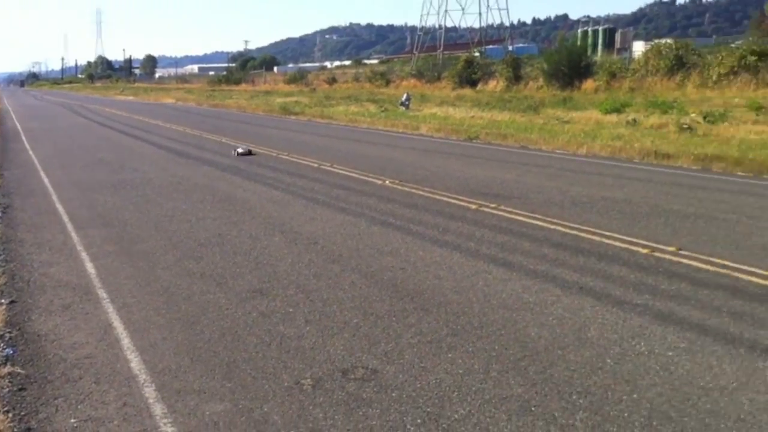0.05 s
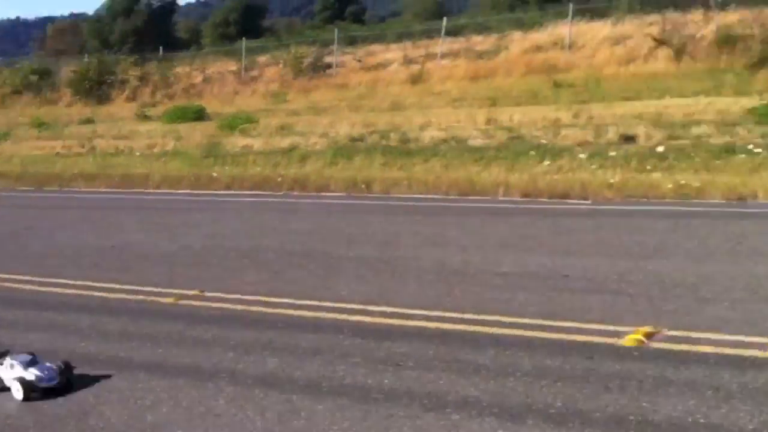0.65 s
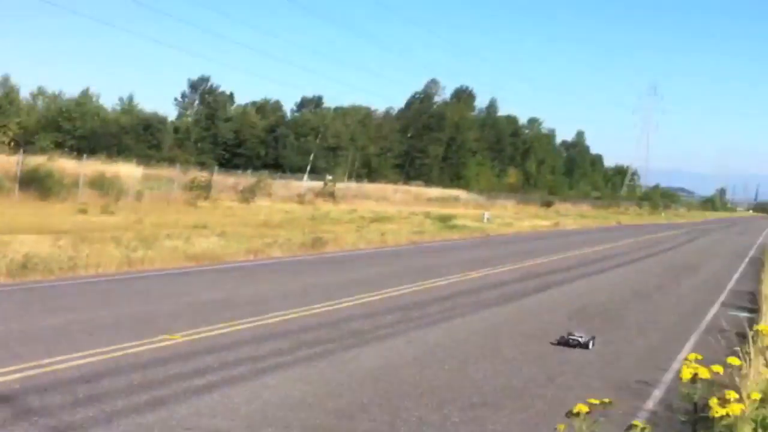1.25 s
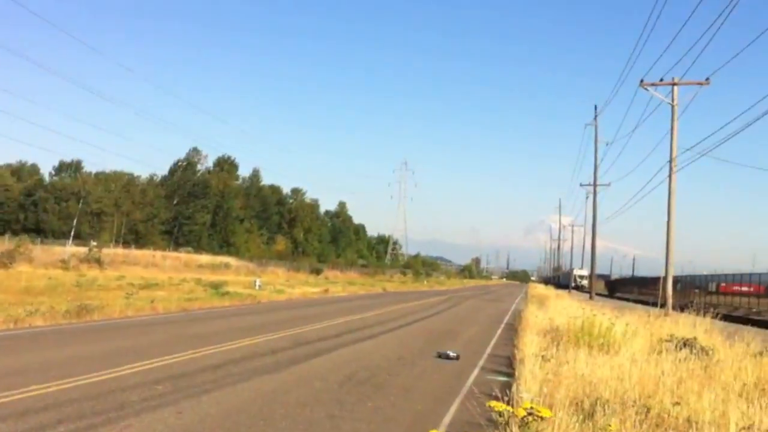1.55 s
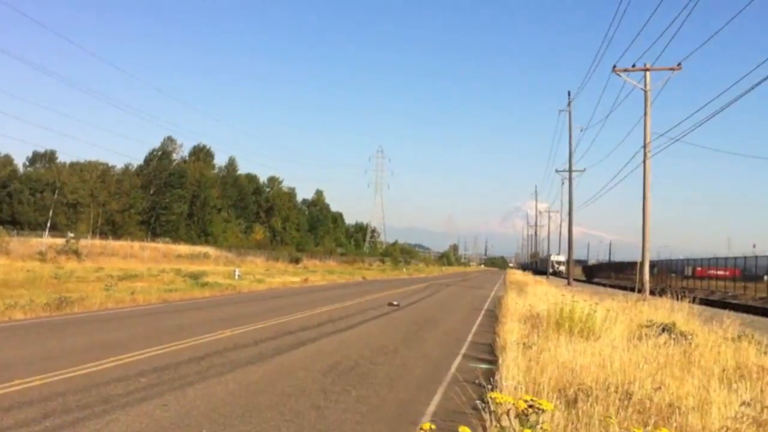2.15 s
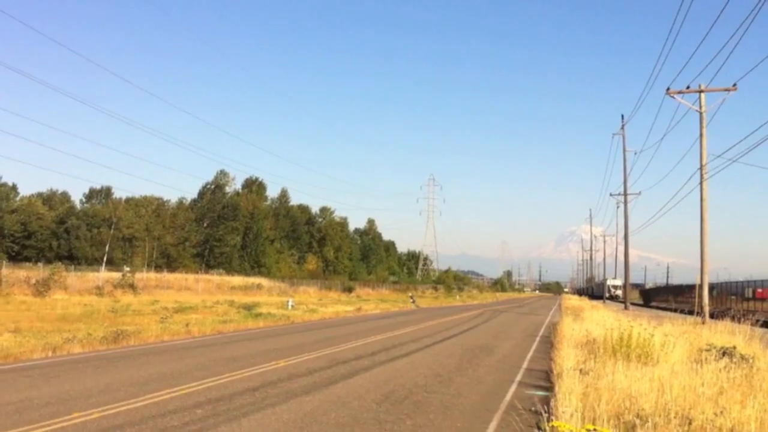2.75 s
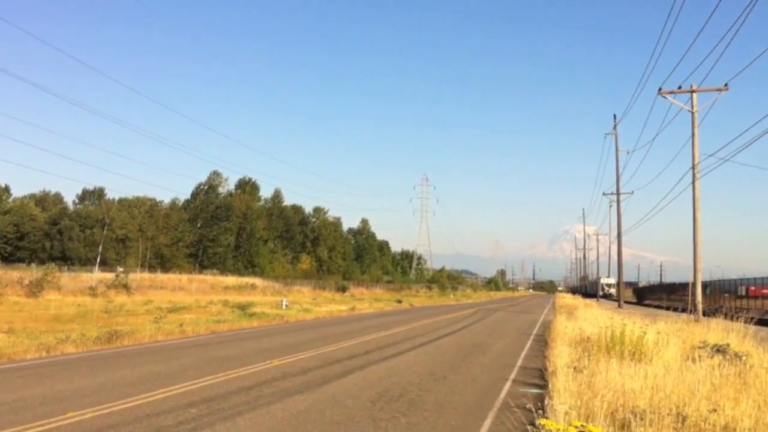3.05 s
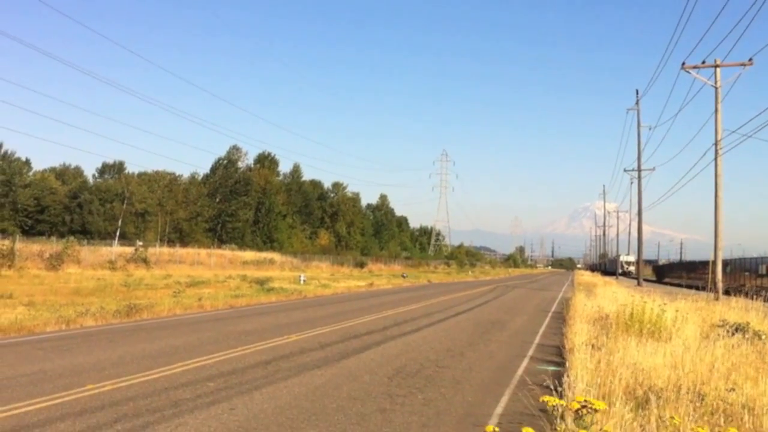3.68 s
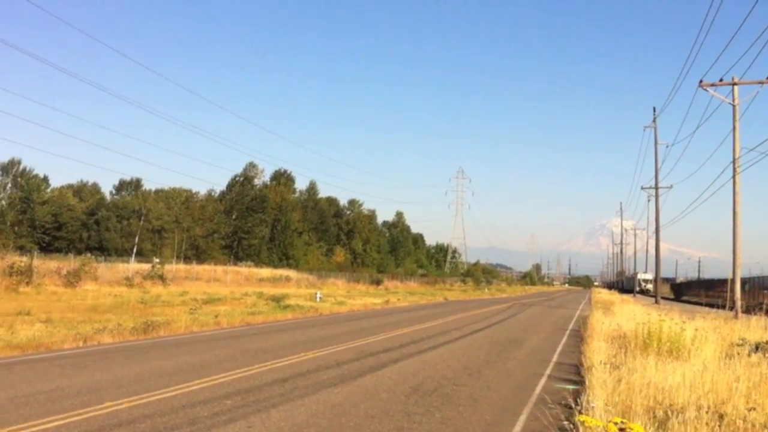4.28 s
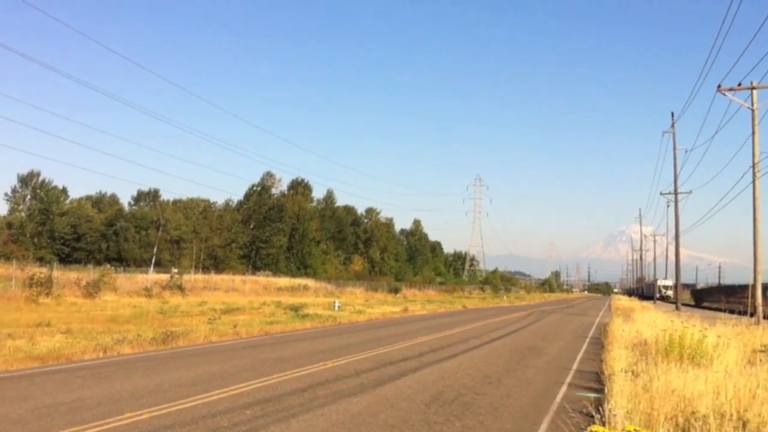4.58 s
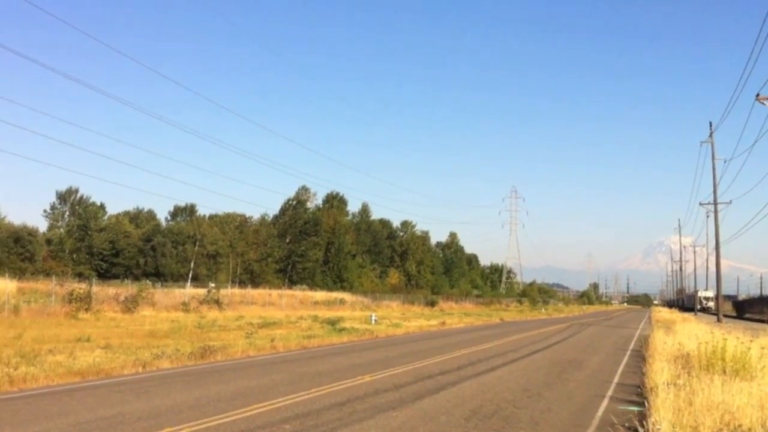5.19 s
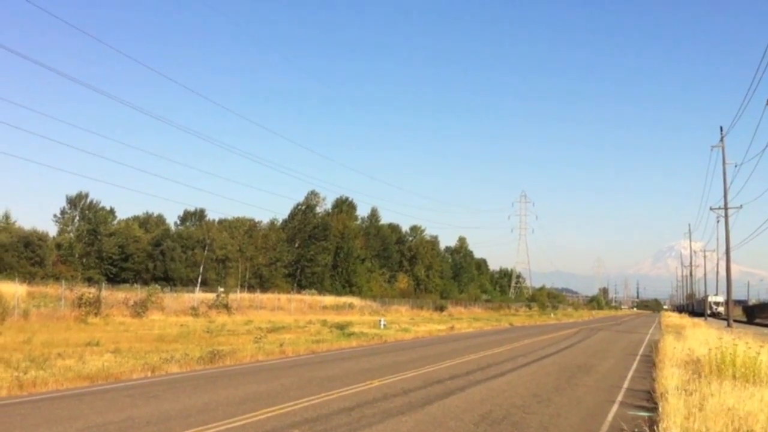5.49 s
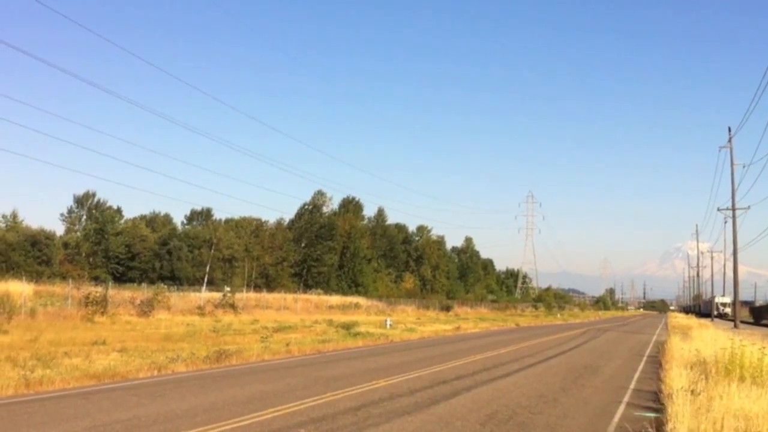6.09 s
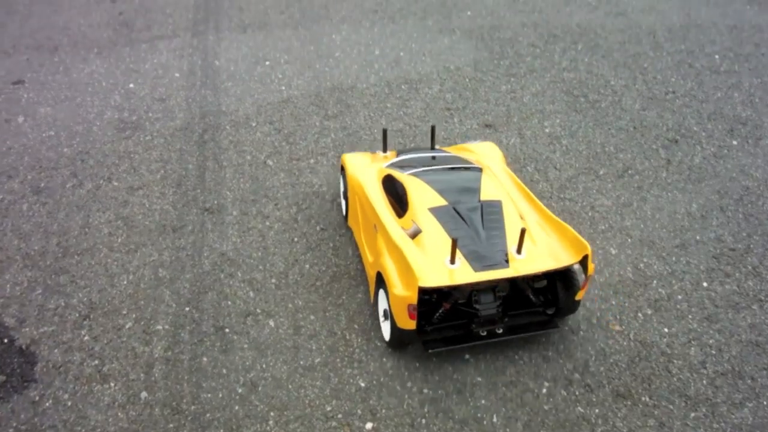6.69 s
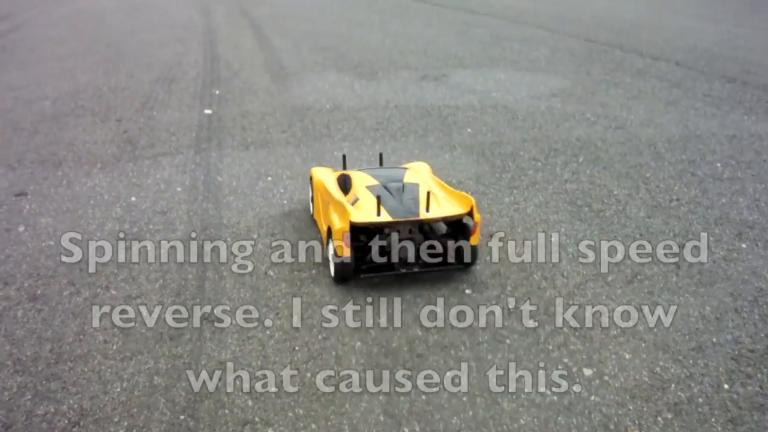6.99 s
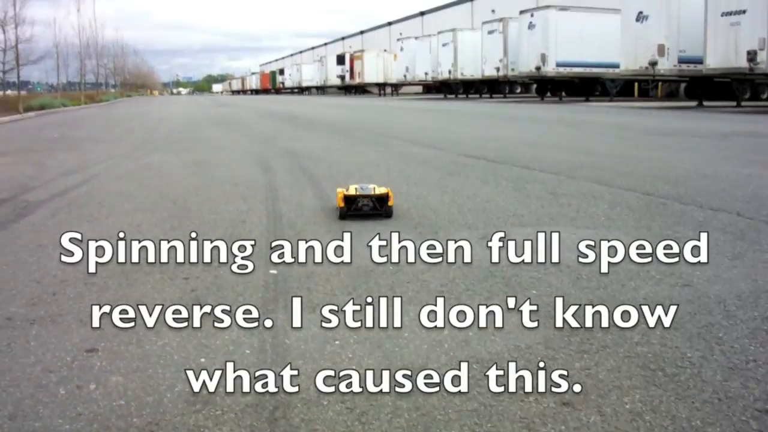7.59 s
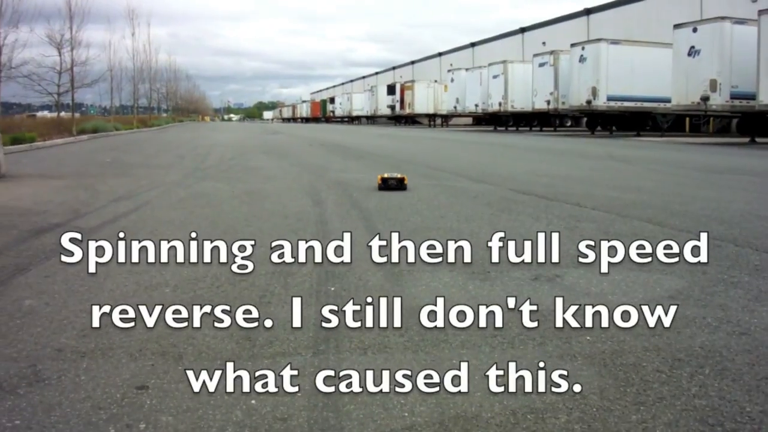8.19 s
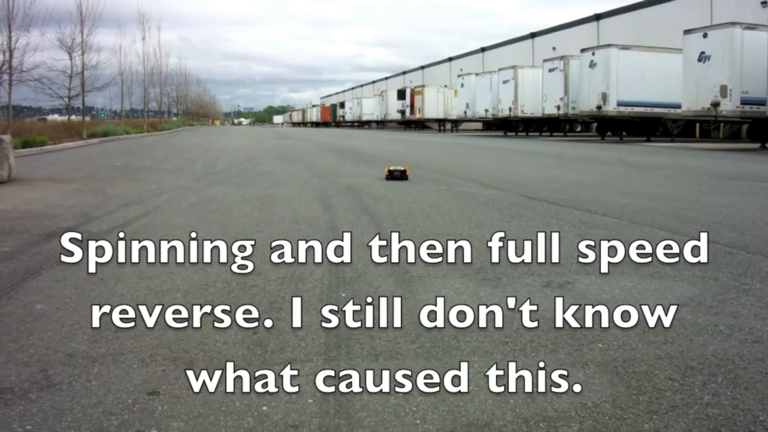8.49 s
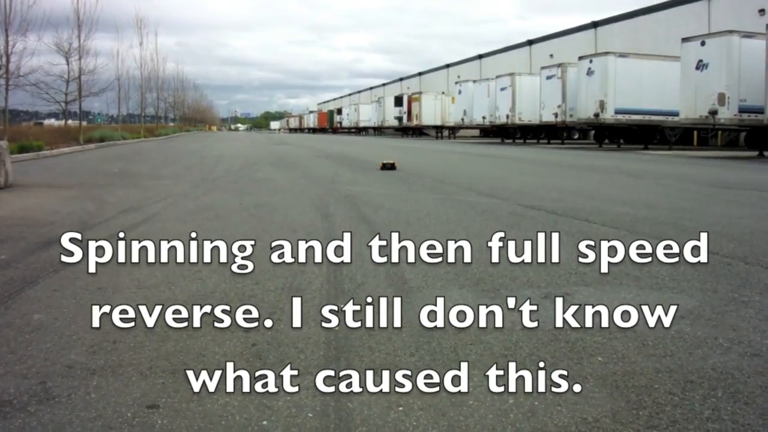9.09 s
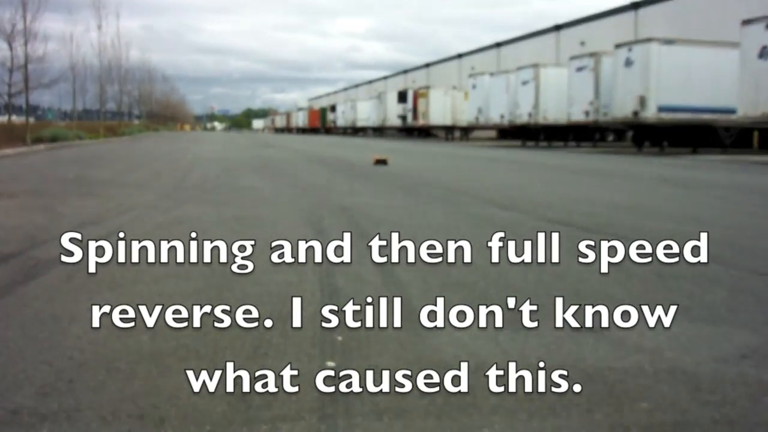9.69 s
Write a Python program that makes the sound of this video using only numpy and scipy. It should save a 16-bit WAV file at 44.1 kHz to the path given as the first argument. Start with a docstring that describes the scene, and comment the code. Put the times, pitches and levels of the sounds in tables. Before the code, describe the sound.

Outdoors on a country road, a faint distant engine hums under a light breeze and soft bumps on the microphone. A radio-controlled car approaches and hisses past at about 1 second, tyres drumming, chassis rattling, its shrill drive dropping in pitch. It rasps briefly as it brakes, then tumbles far off from 2.6 seconds, its hollow plastic shell knocking and scraping until around 4, with faint scrapes afterwards.

At 6.5 seconds the scene changes to a breezy paved lot. A second car stutters close by in rough buzzing bursts, then spins its wheels from 6.8 to 7.6, tyres scrubbing and gears howling upward, slightly overloading the microphone. It coasts with a whir, launches with a grind at 8.2 and whines away, rising gently, amid rumbling gusts. A very loud, sharp crack near the microphone at 9.1 makes everything quieter; a smaller crack follows at 9.6.

```python
"""On a country road, over a distant engine's hum and soft bumps on the camera, a radio-controlled car
hisses past: tyres drum and the shrill drive drops in pitch. Far off it tumbles, its hollow shell
scraping and ringing. Cut to a breezy paved lot: a second car stutters, then spins its wheels, the
howling gears overloading the microphone. It coasts, launches with a grind and whines away. A sharp
crack makes the recorder turn its gain down, and a smaller crack follows."""
import sys
import numpy as np
from scipy import signal
from scipy.fft import rfft, irfft, next_fast_len
from scipy.io import wavfile
from scipy.ndimage import uniform_filter1d, map_coordinates

SR = 44100
rng = np.random.default_rng(int(sys.argv[2]) if len(sys.argv) > 2 else 0)


def wrap_up_sound(samples):
    """Save the sound to the file named by the first command line argument, as 16-bit audio."""
    columns = np.atleast_2d(samples).T
    # keep every value between -1 and 1, then stretch to whole-number steps
    tamed = np.clip(columns, -1, 1)
    steps = np.round(tamed * 32767).astype(np.int16)
    wavfile.write(sys.argv[1], SR, steps)


N = 434385
T = np.arange(N) / SR

CLOSEST_S, LIFT_S, CRASH_S = 0.96, 2.03, 2.516  # first car: nearest, airborne, coming down
LOT_S = 6.538  # cut to the lot
SPIN_S, LET_GO_S, COAST_S, POWER_S = 6.822, 7.57, 7.66, 8.32  # wheelspin, throttle off, coast, launch

# Tone colours of the road. Each row: frequency in Hz, relative level in dB.
AIR_EQ = [(25, -50), (65, -19), (148, -6), (220, -13), (297, -12), (400, -20), (1200, -29), (3000, -40.5),
          (7000, -46.5), (15500, -48)]
BREEZE_EQ = [(30, -34), (80, -8.5), (160, 5), (500, -14.5), (2000, -57)]
TYRE_ROAR_EQ = [(30, -61), (200, -31), (430, -17), (600, -6), (730, -1.5), (870, -3.5), (1080, 1.5),
                (1380, -3.5), (1720, 0), (1950, -2), (2300, -11.5), (5000, -46.5)]
TYRE_RING_EQ = [(700, -35.5), (980, -7), (1080, .5), (1200, -3.5), (1400, -16), (1680, -7), (2000, -26.5)]
GEAR_FLARE_EQ = [(2700, -23.5), (3500, -3), (4800, 1.5), (5800, -12), (8000, -26)]
CHASSIS_EQ = [(1500, -16.5), (2500, 8.5), (3200, 6), (4200, -3.5), (5200, -5.5), (6000, -2.5), (6900, 3),
              (8300, -2), (12000, -25)]
SIZZLE_EQ = [(8000, -20), (12200, 1), (13200, 4.5), (15500, -8)]
CAMERA_CASE_EQ = [(50, -42.5), (110, -12), (170, -1.5), (270, -2), (380, -12.5), (700, -24), (2000, -73.5)]
TICK_EQ = [(2000, -8), (7000, -10.5), (11000, -.5), (15000, -13)]
SHELL_EQ = [(150, -27), (420, -10.5), (620, 8), (850, 1.5), (1180, 6.5), (1400, -3), (1700, 0.5),
            (2600, -14.5), (3600, -9), (4700, -16), (6500, -13), (15000, -29)]
# Tunable noise bands. Each row: multiple of the centre frequency, relative level in dB.
HISS_BAND = [(.55, -24), (.72, -14), (.88, -13.5), (.955, -2.5), (1, 0.5), (1.045, -3), (1.12, -13.5),
             (1.4, -29.5)]
BRAKE_RASP_BAND = [(.62, -22.5), (.9, 0), (1, -0.5), (1.13, -6), (1.35, -21), (2.3, -37)]
# Glides of the shrill drive and the tail's hiss. Each row: time in seconds, centre in Hz, level in dB.
DRIVE_GLIDE = [(0, 9800, -58), (.55, 10700, -35.5), (.82, 11230, -28), (.95, 10310, -21.5),
               (1.06, 8780, -27.5), (1.38, 8690, -40), (2.6, 8720, -94)]
TAIL_GLIDE = [(.8, 10700, -70), (1.03, 10650, -26.5), (1.55, 10070, -34), (2.0, 9580, -43.5),
              (2.8, 9700, -78.5)]
# Wheel speed on the pass. Each row: time in seconds, turns per second.
WHEEL_SPEED = [(0, 82), (.2, 82.5), (.42, 86), (.92, 87), (1.08, 83), (1.42, 83), (1.53, 56), (2.2, 53)]
# Comb filtering from the road bounce. Each row: time in seconds, lowest notch in Hz.
ROAD_NOTCH = [(.92, 2700), (1.0, 2380), (1.6, 2600)]
# Braking rasps. Each row: start and length in seconds, relative level in dB, centre in Hz.
BRAKE_RASPS = [(1.562, .09, -40.5, 5960), (1.68, .34, -35.5, 3450), (1.86, .07, -40.5, 4150)]
# Handling noises. Each row: start in seconds, relative peak in dB.
CAMERA_BUMPS = [(0.049, -31), (0.145, -30), (0.178, -30), (0.481, -28), (0.606, -27.5), (1.168, -27.5),
                (1.498, -27), (3.522, -26), (3.563, -23.5), (3.584, -25.5), (3.61, -26), (3.636, -32.5),
                (3.984, -36.5), (4.725, -34.5), (5.23, -33)]
CLOSE_TICKS = [(3.2767, -43), (3.3887, -39)]
# Shell scrapes. Each row: start in seconds, peak in dB, treble lift in dB, 60 dB decay in seconds.
SHELL_SCRAPES = [(2.648, -25.5, 3.5, .02), (2.663, -26, -2.5, 0.16), (2.941, -39, 1, 0.11),
                 (2.963, -35.5, 0, 0.15), (3.484, -36, 6, 0.28), (3.549, -34, 1.5, 0.3),
                 (3.72, -49.5, 10.5, 0.77), (4.255, -42, -12.5, 0.18), (5.479, -42, 12.5, 0.16)]
# Hard landings. Each row: start in seconds, peak in dB.
LANDINGS = [(2.648, -24), (2.651, -22), (2.6639, -20.5), (2.961, -31.5), (3.555, -27.5)]
# The shell's ring. Each row: pitch in Hz, relative level in dB, 60 dB decay in seconds.
SHELL_RING = [(605, -11.5, .1), (1066, 1.5, 0.055), (1560, 0.5, .035), (2120, -11, 0.044),
              (3400, -11, 0.041), (4060, -13, .03)]

# Tone colours of the lot. Each row: frequency in Hz, relative level in dB.
WIND_EQ = [(20, -19), (45, -4), (100, 0), (180, 2), (280, -12.5), (600, -24.5), (1500, -68)]
RASP_EQ = [(40, -35), (250, -15.5), (450, -14), (830, -10), (890, 1), (960, -12), (1600, -5.5), (2000, -6),
           (2400, 1), (3600, 1), (4200, -7), (6500, -19.5), (8000, -23.5), (15000, -32.5)]
SQUEAL_EQ = [(13500, -50), (14150, -9), (14350, 0), (14600, -12), (15200, -50)]
GRIT_EQ = [(3000, -29), (6500, 1.5), (11000, -4.5), (15500, -10)]
WHIR_EQ = [(150, -46.5), (250, -13.5), (574, -12), (909, -4.5), (1550, -12.5), (1810, -7.5), (2100, -8.5),
           (2350, -3.5), (2550, -8.5), (2780, -5), (3030, -9), (3710, -3), (4150, -14), (4730, -10.5),
           (5450, -16), (6100, -22), (7700, -34), (10000, -62), (16900, -120)]
FIZZ_EQ = [(6000, -31), (7000, 9.5), (7800, -8.5), (9000, -0.5), (15500, -16.5)]
GRIND_EQ = [(500, -29), (1500, -22), (2100, -2), (2450, 0.5), (2900, -3), (4000, -11.5), (6000, -21),
            (15000, -45)]
SNAP_EQ = [(300, -18), (1500, -11.5), (3600, -3), (4400, -8), (5500, 3), (6100, 0), (7200, -19.5),
           (10000, -28.5), (16000, -36)]
# Gusts on the microphone. Each row: start in seconds, level in dB.
WIND_GUSTS = [(8.59, -29), (8.725, -27)]
# The motor catching. Each row: start and length in seconds, relative level in dB.
MOTOR_BURSTS = [(6.583, 0.018, -32), (6.628, 0.056, -22), (6.75, 0.016, -19.5), (6.8, 0.021, -21)]
# Gear pitch in the stutter, the spin and the run. Each row: time in seconds, tooth rate in Hz.
STUTTER_PITCH = [(6.68, 854), (6.74, 763), (6.80, 829), (6.83, 740)]
SPIN_PITCH = [(6.82, 1194), (6.90, 1140), (6.925, 975), (6.95, 895), (7.01, 885.7), (7.06, 1085),
              (7.13, 1109), (7.41, 1510), (7.46, 1488), (7.66, 1468)]
RUN_PITCH = [(7.58, 676), (7.70, 717), (8.11, 719.3), (8.20, 865), (8.29, 929.7), (8.62, 913.4),
             (9.05, 951.7), (9.30, 967), (9.85, 1008)]
# Fader moves for tyre scrub and coasting whir. Each row: time in seconds, relative level in dB.
SCRUB_FADER = [(6.83, -47.5), (6.91, -41), (6.952, -29.5), (7.01, -24), (7.028, -32.5), (7.164, -36.5),
               (7.35, -29), (7.552, -27), (7.568, -40), (7.66, -43.5)]
COAST_FADER = [(7.66, -22.5), (7.868, -36), (8.006, -30), (8.08, -32), (8.12, -31.5)]
# Gearbox resonances. Each row: centre in Hz, width in Hz, gain in dB.
GEARBOX_PEAKS = [(895, 120, -15), (1394, 204, -14.5), (2275, 300, -22.5), (2750, 370, -17.5),
                 (3056, 170, -14), (3480, 260, -19), (3740, 120, -17.5), (4480, 420, -20.5)]
# Whine harmonics 1-5 against the whir. Each row: dB coasting, dB under power, drift in dB per second.
WHINE_HARMONICS = [(-13, -15.5, -3.5), (-26, -10, 0.5), (-15, -4, -6.5), (-14, -10, -3.5), (-13, -15.5, -2)]
# Close cracks. Each row: start in seconds, peak before clipping in dB, relative thud and body in dB.
CLOSE_CRACKS = [(9.0893, 14, -17, 6), (9.563, -2, -32, -5)]


def amp(db):
    """Decibels to gain."""
    return 10 ** (np.asarray(db) / 20)


def unit(x):
    """Scale to rms 1."""
    return x / np.sqrt(np.mean(x ** 2) + 1e-20)


def curves(rows):
    """One automation curve for each column after the time."""
    times, *columns = np.transpose(rows)
    return [np.interp(T, times, column) for column in columns]


def ramp(start, length):
    """A straight fade from 0 to 1."""
    return np.clip((T - start) / length, 0, 1)


def during(start, end, fade):
    """A gate, open between two times, with straight fades."""
    return np.clip(np.minimum(T - start, end - T) / fade + .5, 0, 1)


def held(start, length, db, rise, fall):
    """Gain that swells up to its start, holds and dies away; rise and fall are in dB per second."""
    return amp(db - rise * np.maximum(start - T, 0) - fall * np.maximum(T - start - length, 0))


def wobble(rate):
    """A smooth random curve, rate knots a second."""
    return map_coordinates(rng.standard_normal(int(N * rate / SR) + 4), [T * rate])


def colour(x, eq):
    """Minimum-phase EQ through (Hz, dB) points."""
    size = 2 * next_fast_len(len(x) // 2 + 4096)
    hz, db = np.transpose(eq)
    gain = amp(np.interp(np.log(np.fft.rfftfreq(size, 1 / SR) + 1), np.log(hz), db))
    cepstrum = irfft(np.log(gain))
    cepstrum[1:size // 2] *= 2
    cepstrum[size // 2 + 1:] = 0
    return irfft(rfft(x, size) * np.exp(rfft(cepstrum)))[:len(x)]


def rush(eq, grain_db=0, grain_rate=600):
    """Noise of rms 1: clumps of tiny impacts ringing through an EQ."""
    return unit(colour(rng.standard_normal(N) * amp(grain_db * wobble(grain_rate)), eq))


def burst(eq, t60):
    """A dying rattle through a body, peak 1."""
    t = np.arange(SR // 2) / SR
    x = colour(rng.standard_normal(len(t)) * amp(-60 * t / t60), eq)
    return x / np.abs(x).max()


def add(track, start, x):
    """Mix a sound in at a time."""
    room = track[round(start * SR):][:len(x)]
    room += x[:len(room)]


def varispeed(x, speed):
    """Loop a sound at a changing speed, bending its pitch."""
    return map_coordinates(x, [np.cumsum(speed)], order=3, mode="wrap")


def patchy(x, depth_db):
    """Let the colour wander in patches about 500 Hz wide and 0.2 s long."""
    spectra = signal.stft(x, nperseg=512)[2]
    patches = uniform_filter1d(rng.standard_normal(spectra.shape), size=6, axis=0)
    patches = uniform_filter1d(patches, size=36, axis=1)
    return signal.istft(spectra * unit(amp(depth_db * unit(patches))), nperseg=512)[1][:N]


def roadside():
    """The bed: open air, a distant engine's wavering hum and an opening breath of breeze."""
    hum = amp(1.8 * wobble(13)) * np.sin(2 * np.pi * np.cumsum(149 + 4 * wobble(17)) / SR)
    breeze = amp(-41 + 1.6 * wobble(8.4)) * during(-1, 1.39, fade=.48) * rush(BREEZE_EQ)
    ease_off = amp(np.interp(T, [5.5, 6.4], [0, -3]))
    return ease_off * (amp(-51.5) * rush(AIR_EQ) + amp(-49.5) * hum) + breeze


def pass_fader(db, coming, going, lift_db):
    """Gain falls as a power of distance, coming or going, dips at lift-off and dies with the crash."""
    distance = np.hypot(1, (T - CLOSEST_S) / .2)  # 1 when nearest
    lost_db = lift_db * ramp(LIFT_S, .25) + 45 * np.maximum(T - CRASH_S, 0)
    return amp(db - lost_db) / distance ** np.where(T < CLOSEST_S, coming, going)


def doppler(x, mach):
    """Pitch swings from sharp to flat as the car goes by."""
    bearing = (T - CLOSEST_S) / np.hypot(T - CLOSEST_S, .07)  # -1 coming, 1 going
    return varispeed(x, 1 / (1 + mach * bearing))


def tyres():
    """Tyres drum on coarse asphalt; their own ring lingers furthest down the road."""
    roar = doppler(rush(TYRE_ROAR_EQ, grain_db=1), mach=.13)
    roar *= pass_fader(-23.5, coming=1.79, going=1.53, lift_db=6)
    return roar + pass_fader(-34.5, coming=2, going=.4, lift_db=10) * rush(TYRE_RING_EQ)


def chassis_rattle(sway):
    """An unbalanced wheel shakes the chassis once a turn."""
    level = pass_fader(-27.5, coming=1.25, going=.8, lift_db=12)
    return level * unit(amp(5.5 * sway)) * doppler(rush(CHASSIS_EQ), mach=.04)


def drive_hiss(glide):
    """A shrill band of fine grains whose centre and level follow a glide."""
    hz, db = curves(glide)
    centre = np.mean(hz)
    band = rush([(centre * ratio, level) for ratio, level in HISS_BAND], grain_db=3, grain_rate=970)
    return amp(db) * unit(varispeed(band, hz / centre))


def passing_car():
    """The whole pass-by: tyres, gears and chassis with their bounce off the road, plus the drive's hiss."""
    rolling = tyres()
    # side-on, the gears are heard directly for an instant
    flare = held(.93, .04, db=-32, rise=148, fall=128.5) * rush(GEAR_FLARE_EQ, grain_db=3)
    turns = np.cumsum(curves(WHEEL_SPEED)[0] * (1 + .008 * wobble(25))) / SR
    sway = np.sin(2 * np.pi * turns)
    rattle = chassis_rattle(sway)
    brake = braking(turns)
    sizzle = rush(SIZZLE_EQ, grain_db=2.5, grain_rate=880)
    sizzle *= pass_fader(-25, coming=2.1, going=1.9, lift_db=14)  # the top end carries least far
    # the body beams its treble unevenly as it turns past the microphone
    car = rolling + patchy(sizzle + flare + rattle + brake, depth_db=1.8)
    drive = patchy(drive_hiss(DRIVE_GLIDE) + drive_hiss(TAIL_GLIDE), depth_db=1.8)
    drive *= unit(amp(1.5 * sway))
    delay_s = .5 / curves(ROAD_NOTCH)[0]
    bounce = .8 * map_coordinates(car, [(T - delay_s) * SR], order=3)
    bounce *= 1 - .5 * during(.99, 1.05, fade=.073)  # weak while the car flashes by
    return amp(-2) * (car + bounce) + drive


def handling():
    """Dull bumps on the camera and tiny ticks close to the microphone."""
    out = np.zeros(N)
    for start, db in CAMERA_BUMPS:
        add(out, start, amp(db + 1) * burst(CAMERA_CASE_EQ, t60=.088))
    for start, db in CLOSE_TICKS:
        add(out, start, amp(db + 2) * burst(TICK_EQ, t60=.005))
    return out


def braking(turns):
    """The gears rasp as the car brakes, chopped once a turn by the unbalanced wheel."""
    out = np.zeros(N)
    for start, length, db, hz in BRAKE_RASPS:
        eq = [(hz * ratio, level) for ratio, level in BRAKE_RASP_BAND]
        out += held(start, length, db, rise=63, fall=106) * rush(eq, grain_db=.5, grain_rate=200)
    return out * unit(amp(-20 * (turns % 1)))


def tumble():
    """The plastic shell scrapes along the road."""
    out = np.zeros(N)
    for start, db, treble_db, t60 in SHELL_SCRAPES:
        eq = [(hz, level + treble_db * (hz > 2200)) for hz, level in SHELL_EQ]
        add(out, start, amp(db) * burst(eq, t60))
    return out


def knocks():
    """Each hard landing rings the hollow shell with a slightly different colour."""
    out, t = np.zeros(N), np.arange(SR // 5) / SR
    for start, db in LANDINGS:
        ring = sum(amp(level + rng.normal(0, 2.4) - 60 * t / t60) * np.sin(2 * np.pi * hz * t)
                   for hz, level, t60 in SHELL_RING)
        add(out, start, amp(db) * ring / np.abs(ring).max())
    return out


def wind():
    """Wind rumbles on the microphone in the lot: it freshens as the car sets off and gusts twice."""
    steady = amp(-47.5 + 13.5 * ramp(8.1, .22) + 1.6 * wobble(12))
    gusts = sum(held(start, .015, db, rise=350, fall=300) for start, db in WIND_GUSTS)
    return (T > LOT_S) * np.hypot(steady, gusts) * rush(WIND_EQ)


def gear_tone(hz, harmonics_db, jitter, flutter_db, runout=0, rough=0):
    """Gear teeth meeting: fluttering harmonics of one unsteady speed."""
    phase = 2 * np.pi * np.cumsum(hz * (1 + jitter * wobble(260) + .001987 * wobble(30))) / SR
    sway = runout * np.sin(phase / 16)  # an off-centre pinion of 16 teeth
    teeth = phase + sway + rough * wobble(800)  # slack teeth strike early or late
    return sum(amp(db) * unit(amp(flutter_db * wobble(110)) * np.sin(k * teeth))
               for k, db in enumerate(harmonics_db, 1))


def stutter():
    """The motor catches and lets go: rough bursts of gear buzz with a thin squeal."""
    hz, = curves(STUTTER_PITCH)
    buzz = gear_tone(hz, [-20.5, -4.5, -16.5, -5.5, -23, -15.5], jitter=.025, flutter_db=4.5, rough=.15)
    rasp = amp(-1.5) * rush(RASP_EQ, grain_db=2, grain_rate=400)
    squeal = amp(-25) * rush(SQUEAL_EQ)
    idle = held(6.575, .25, db=-27.5, rise=600, fall=900)
    bursts = sum(held(*row, rise=2600, fall=1100) for row in MOTOR_BURSTS)
    return (T > LOT_S) * ((idle + bursts) * (rasp + squeal) + (.5 * idle + bursts) * buzz)


def gearbox_db(hz):
    """How strongly the gearbox radiates a tone: resonant peaks over a flat floor."""
    peaks = sum((amp(db) / (1 + (2 * (hz - centre) / width) ** 2)) ** 2
                for centre, width, db in GEARBOX_PEAKS)
    return 10 * np.log10(peaks + amp(-29.5) ** 2)


def wheelspin():
    """The gears howl through the gearbox's resonances, roughly at first, while the tyres scrub on grit."""
    hz, = curves(SPIN_PITCH)
    scrub_db = curves(SCRUB_FADER)[0] - np.mean(SCRUB_FADER, axis=0)[1]
    rasp = amp(-19 + .53 * scrub_db) * rush(RASP_EQ, grain_db=2, grain_rate=400)
    grit = amp(-42.5 + 1.7 * scrub_db) * rush(GRIT_EQ, grain_db=4, grain_rate=220)
    slack_db = -25 * ramp(LET_GO_S - .015, .033)  # off the throttle only the second harmonic sings on
    loose = 1 - ramp(SPIN_S + .03, .07)  # the teeth take a moment to bite
    drive_db = [-1 - 9 * loose + slack_db, -5 * loose,
                -3 - 4 * loose + slack_db, -8.5 - 9 * loose + slack_db]
    harmonics_db = [db + gearbox_db(k * hz) for k, db in enumerate(drive_db, 1)]
    jitter = np.interp(T, [7, 7.45], [.022, .003])
    rough = np.interp(T, [7.05, 7.35], [.22, .05])
    howl = gear_tone(hz, harmonics_db, jitter, flutter_db=3, runout=.22, rough=rough)
    return during(SPIN_S, COAST_S, fade=.008) * (rasp + grit + howl)


def soft_clip(x, ceiling):
    """Round off the peaks below a ceiling."""
    return x / (1 + np.abs(x / ceiling) ** 6) ** (1 / 6)


def mic_overload(x):
    """Close to the car the microphone saturates softly; the deepest bass is rolled off."""
    return colour(soft_clip(x, amp(-13.5)), [(25, -13), (70, 0)])


def run_away():
    """The car coasts, launches with a harsh grind and a chirp, and whines off into the distance."""
    hz, = curves(RUN_PITCH)
    driven_s = np.maximum(T - POWER_S, 0)
    power = ramp(POWER_S - .17, .13)
    distance = np.hypot(1, driven_s / 1.13)
    level = amp((1 - power) * curves(COAST_FADER)[0] - 20.5 * power) / distance
    whir = rush(WHIR_EQ, grain_db=1) + amp(-20) * rush(FIZZ_EQ, grain_db=1.5)
    whir *= ramp(COAST_S - .004, .0056)
    harmonics_db = [(1 - power) * coasting + power * driven + drift * driven_s
                    for coasting, driven, drift in WHINE_HARMONICS]
    whine = ramp(LET_GO_S, .026) * gear_tone(hz, harmonics_db, jitter=.003, flutter_db=2, runout=.1)
    bite = held(8.215, .07, db=-17, rise=200, fall=400) + held(8.268, .01, db=-20, rise=1500, fall=1500)
    grind = bite * rush(GRIND_EQ, grain_db=1, grain_rate=330)
    chirp = gear_tone(hz, [1.5, -9, -6], jitter=.0076, flutter_db=3)
    chirp *= held(8.19, .025, db=-25, rise=216, fall=220)
    return level * (whir + whine) + grind + chirp


def cracks():
    """Each crack is a hard snap with a short low ring of the camera's case."""
    out, t = np.zeros(N), np.arange(SR // 10) / SR
    for start, db, thud_db, body_db in CLOSE_CRACKS:
        eq = [(hz, level + body_db * (hz < 4500)) for hz, level in SNAP_EQ]
        add(out, start, amp(db) * burst(eq, t60=.008))
        add(out, start, amp(db + thud_db) * np.sin(2 * np.pi * 660 * t) * amp(-60 * t / .035))
    return out


def scene():
    """The mono mix: first the road, then the lot."""
    road = passing_car() + tumble() + knocks() + handling() + roadside()
    lot = mic_overload(stutter() + wheelspin()) + run_away() + wind() + cracks()
    return (road * during(-1, 6.49, fade=.071) + lot)[None]


def record(dry):
    """The recorder clips softly; just after a hard overload its gain steps down and stays there."""
    clipped = soft_clip(dry, ceiling=.92)
    overloaded = uniform_filter1d(clipped ** 2, 64, axis=-1) > .33
    latched = np.maximum.accumulate(overloaded, axis=-1)
    turned_down = np.pad(latched, ((0, 0), (1130, 0)))[:, :N]  # reacts 26 ms late
    out = clipped * amp(-8 * turned_down)
    high_cut = np.fft.rfftfreq(N, 1 / SR) < 15850
    return irfft(rfft(out) * high_cut, N)


dry = scene()
out = record(dry)
wrap_up_sound(out)
```